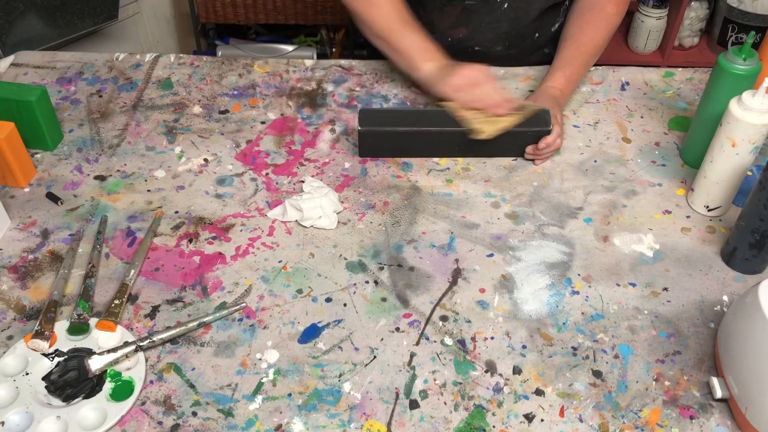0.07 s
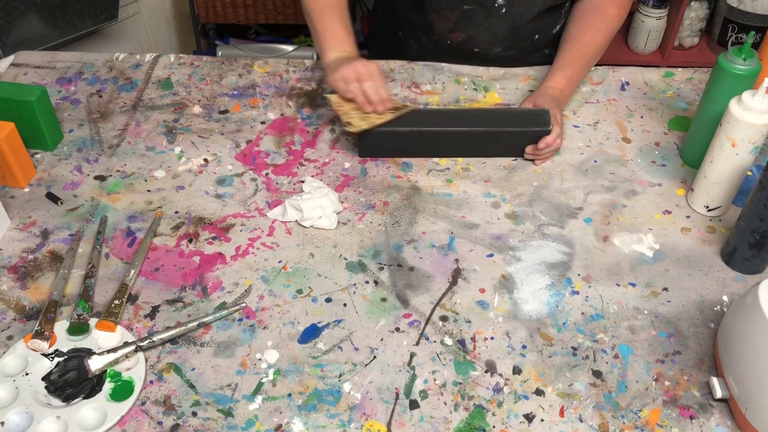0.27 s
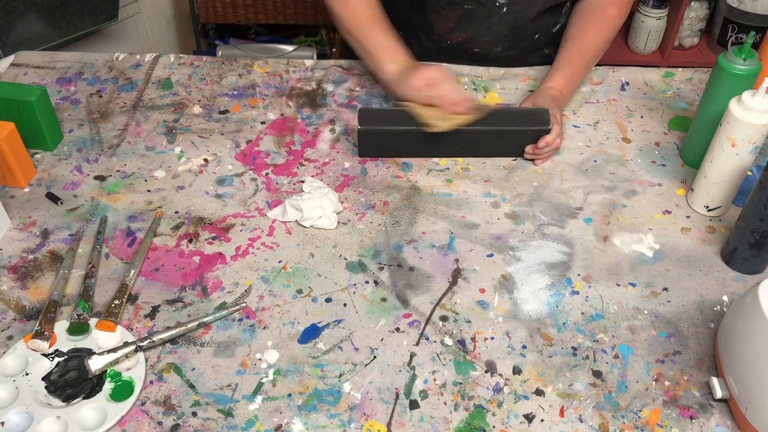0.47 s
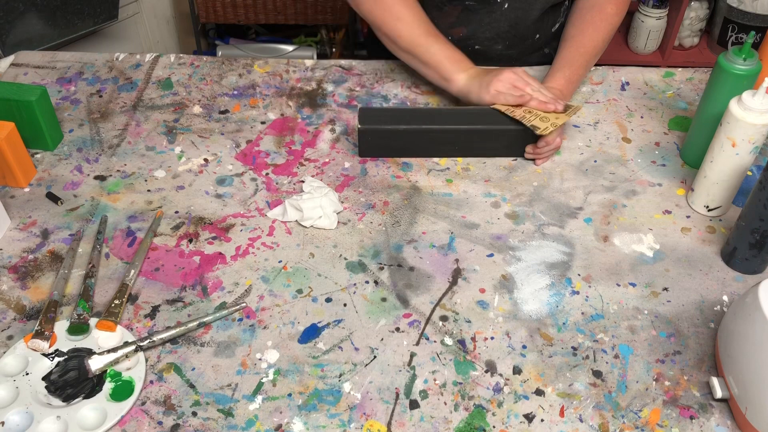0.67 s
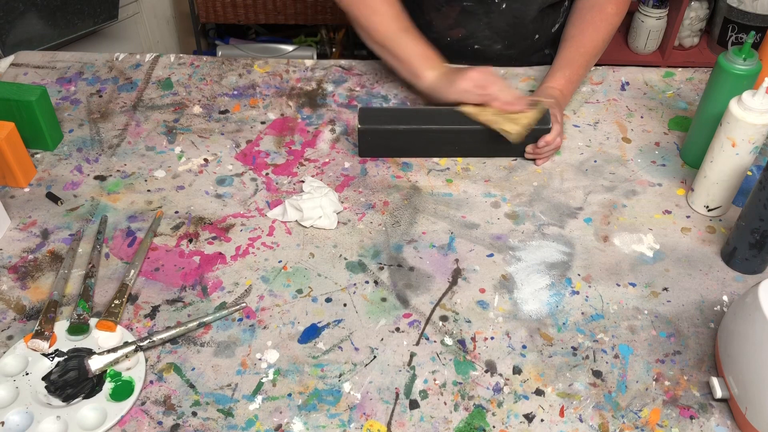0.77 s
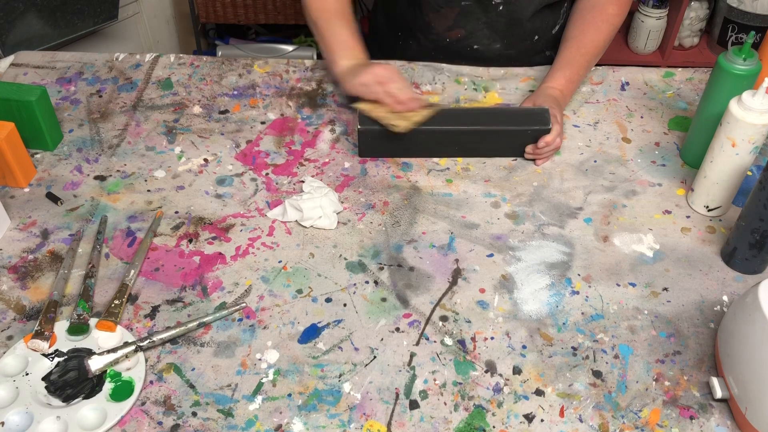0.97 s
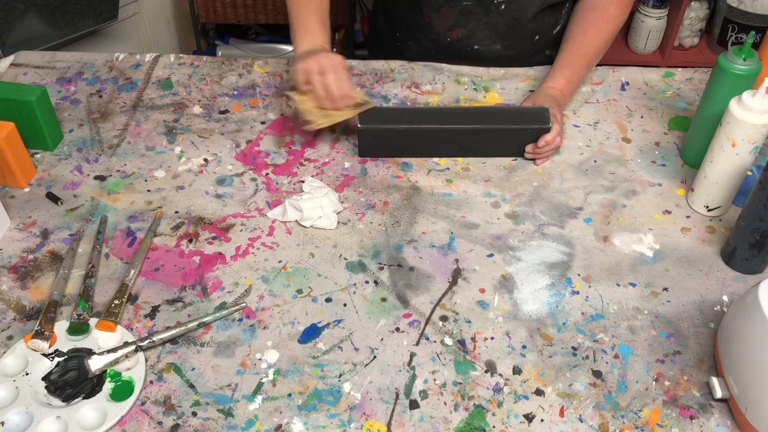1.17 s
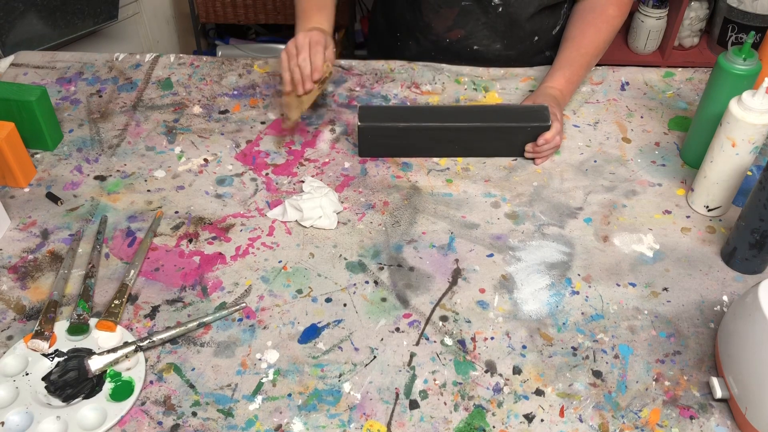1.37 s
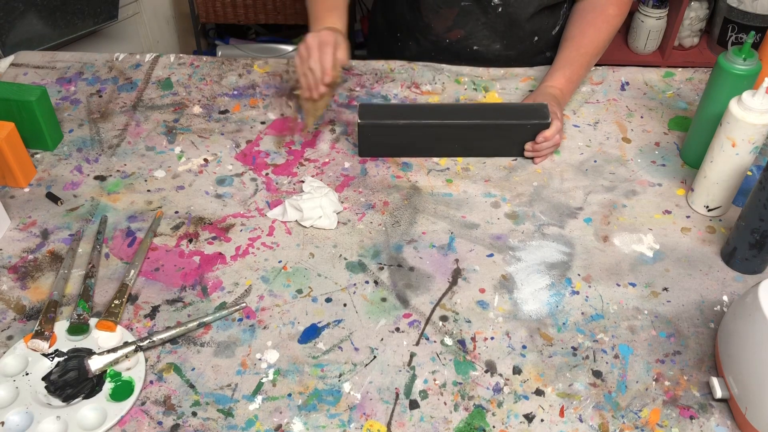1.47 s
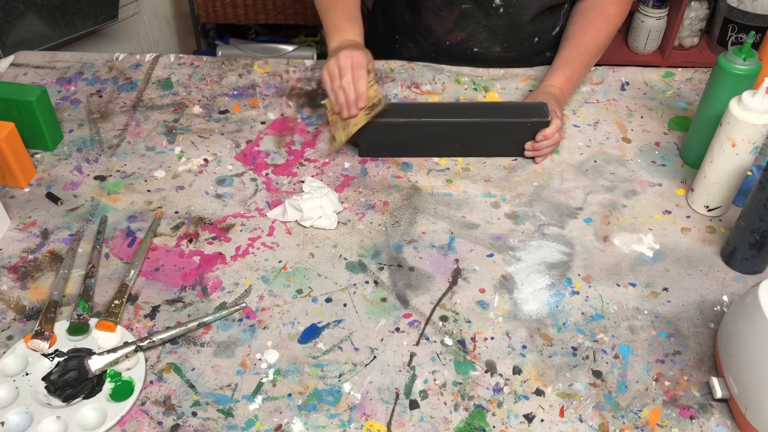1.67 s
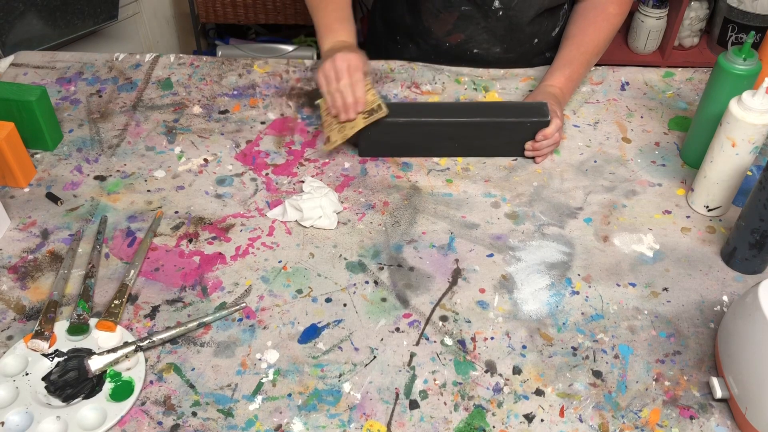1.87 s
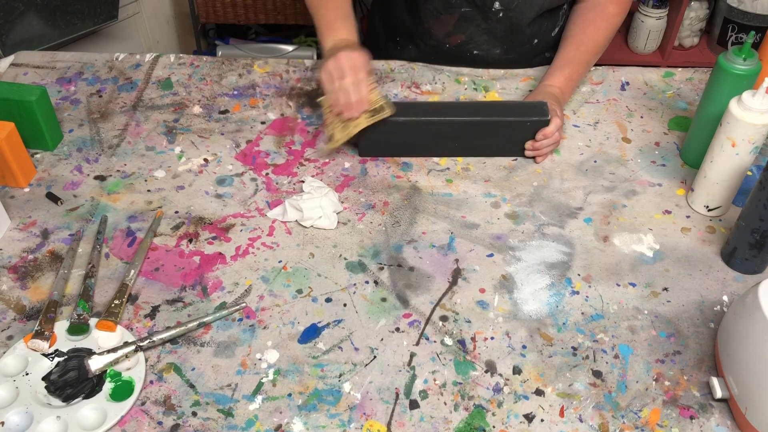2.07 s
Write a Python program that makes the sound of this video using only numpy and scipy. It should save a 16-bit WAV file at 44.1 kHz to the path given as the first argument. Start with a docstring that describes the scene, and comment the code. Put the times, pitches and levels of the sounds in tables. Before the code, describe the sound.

Sandpaper rubs the edge of a wooden block in three long, gritty strokes, then after a brief gap with a small knock and crackle, makes quick short scrapes on its end; close, in a room with low fan hum.

```python
"""At a table in a room with a fan, sandpaper rubs a wooden block: three long strokes along its edge,
then quick short strokes on its end. Dense random clicks stand for the grit. They ring the block
through resonances, and are filtered into paper hiss and table rumble. Knocks are sums of dying tones,
cracks are tiny noise bursts, and a faint tone dies away. A noise tail makes the echo.
Behind it are filtered fan noise, a low hum and a slow sway in air pressure."""
import sys
import numpy as np
from scipy import signal
from scipy.fft import rfft, irfft
from scipy.io import wavfile
from scipy.ndimage import map_coordinates

SR = 44100
rng = np.random.default_rng(int(sys.argv[2]) if len(sys.argv) > 2 else 0)


def master_out(mix):
    """Clip the mix to full scale and print it as 16-bit PCM to the path in sys.argv[1]."""
    frames = np.transpose(np.atleast_2d(mix))
    ceiling = np.clip(frames, -1, 1)
    pcm = np.round(ceiling * 32767).astype(np.int16)
    wavfile.write(sys.argv[1], SR, pcm)


N = 93756  # length in samples

# Long strokes along the edge: t/s, level/dB, then parts relative to that level, before their own trims:
# low ring/dB, second ring/dB, third ring/dB, paper hiss/dB
LONG_STROKES = [
    [(0.012, -41, -3, -14, -12, -6), (0.066, -24, -13, -10.5, -11.5, -8.5),
     (0.104, -27.5, -9.5, -9.5, -2, -0.5), (0.198, -26, -14.5, -10, -6.5, -2),
     (0.286, -29.5, -4, -9.5, -17, -2.5), (0.322, -29, -8.5, -9, -23, -8.5), (0.37, -53, 2, -22, -14, -14)],
    [(0.37, -51, 2, -9, -11, -13), (0.42, -31, -10, -7.5, -38, -1), (0.464, -29, -5.5, -8, -6, -1),
     (0.608, -29.5, -9.5, -2, -6, 3), (0.664, -39.5, -3, 0, -10, 3.5), (0.715, -55.5, -7, -10, -14, -5)],
    [(0.715, -53, -5, -17, -15, -10), (0.763, -26.5, -9.5, -13, -13, -28),
     (0.797, -20.5, -18.5, -15.5, -5, -11), (1.101, -25.5, -2.5, -14, -16, -7),
     (1.143, -37, 1, -6.5, -11, -3.5), (1.187, -29, -3, -12.5, -11, -9),
     (1.237, -41.5, -11.5, -30, -6.5, -9.5), (1.27, -88, -11, -10, -8, -6)],
]
# Short strokes on the end: t/s, level/dB, table rumble/dB (not relative),
# then relative to level: paper hiss/dB, low ring/dB; the last three are before their own trims
SHORT_STROKES = [
    [(1.632, -48, -44, 4, -4), (1.644, -53.5, -40.5, -6, 2), (1.668, -70, -50, -14, -9)],
    [(1.672, -69, -65, -10, -5), (1.692, -29, -41, -7.5, -7.5), (1.714, -35.5, -46, -7, -6),
     (1.728, -42, -44, -6, -8), (1.746, -62, -48, 1, -6), (1.76, -66, -65, -1, -6)],
    [(1.765, -68, -52, -10, -6), (1.771, -55, -62, -6, -11), (1.787, -31, -44, -12, -11.5),
     (1.803, -36.5, -41.5, -12, -8), (1.825, -53, -38, 0, -2), (1.84, -73, -70, -8, -5)],
    [(1.84, -66, -66, 1, -4), (1.86, -36, -39.5, -7.5, -11), (1.882, -31.5, -39, -10, -11),
     (1.904, -49, -46, 6, -10), (1.917, -65, -60, -2, -8)],
    [(1.917, -70, -54, -2, -6), (1.929, -34, -51, -5, -12), (1.943, -40, -34.5, -5, -9),
     (1.963, -26.5, -35.5, -8.5, -7), (1.977, -28.5, -34, -9.5, -13), (2.005, -66, -51, 1, 0)],
    [(2.005, -56, -55, -5, -3), (2.011, -62, -63, 2, -7), (2.023, -34.5, -45, -4, -10.5),
     (2.055, -34.5, -30.5, -2.5, -5), (2.065, -29, -41, -5.5, -10.5), (2.098, -60, -41, 2, -5)],
    [(2.098, -73, -61, 6, -15), (2.116, -34.5, -42, 0.5, -8), (2.125, -35, -37, -2, -9)],
]

# Block resonances: f/Hz, width/Hz, level/dB (within the set; a resonance used alone is scaled to rms 1)
EDGE_SECOND_RING = [(2760, 1650, -2)]
EDGE_LOW_RING = [(1312, 660, -2.74), (1910, 1070, -1.5)]
EDGE_THIRD_RING = [(3880, 1500, -0.39), (4800, 820, -1.1)]
EDGE_UPPER_RING = [(5340, 2000, 0.2), (6900, 620, -0.32), (7660, 640, -2.6)]
END_MAIN_RING = [(3180, 280, 3), (4357, 140, 2.5), (5130, 250, -3), (7500, 330, -13), (10200, 600, -14.5)]
END_LOW_RING = [(1518, 240, -2.5), (2040, 570, -3), (2670, 450, -5.5)]

# Spectrum shapes, each scaled to rms 1 afterwards: f/Hz, level/dB
PAPER_HISS = [(2000, -78), (5000, -2), (8000, -1.5), (11000, -3.5), (14000, -4.5), (16000, -10)]
EDGE_TABLE_RUMBLE = [(60, -5), (200, -1), (400, -5), (800, -3), (1100, -10.5), (2500, -102)]
END_TABLE_RUMBLE = [(60, -21), (200, 3), (380, 1), (550, -3.5), (800, -11), (1100, -16), (2500, -48)]
FAN_NOISE = [(15, -23), (25, 11.5), (64, -8), (107, -4.5), (144, -0.5), (183, 1.5), (267, -29.5),
             (313, -17.5), (421, -30), (482, -22.5), (614, -31), (762, -25.5), (919, -35), (3720, -54),
             (10400, -47.5), (12800, -50), (15500, -56)]

# Bounce off the table top, as the spacing of the spectrum peaks it makes: t/s, spacing f/Hz
TABLE_BOUNCE = [(0, 1300), (.15, 1390), (.3, 1580), (.42, 1585), (.6, 1360), (.8, 1340), (.92, 1400),
                (1.02, 1527), (1.2, 1604)]
# Bounce spacings between which the edge's low ring glides: lower f/Hz, upper f/Hz
LOW_RING_GLIDE = (1420, 1660)
# Knocks of paper or hand on the block: t/s, peak level/dB, softness f/Hz
BLOCK_KNOCKS = [(1.214, -29.5, 1500), (1.315, -43.5, 4000), (1.6315, -24, 9000), (1.635, -26, 3000),
                (1.6373, -36, 5000)]
# Ways the block on the table vibrates when knocked: f/Hz, level/dB before softening, time to fall 60 dB/s
BLOCK_MODES = [(315, 3, 0.019), (590, -8, 0.043), (973, -9, 0.076), (1560, -11, 0.032), (1910, 3.5, 0.014),
               (2320, 2, 0.01), (2930, -17, .012), (4570, -2, 0.0054), (6000, 0, 0.0051),
               (8500, -14, 0.0026)]
# Paper cracks: t/s, peak level/dB
PAPER_CRACKS = [(1.4955, -52), (1.5135, -24), (1.5131, -37)]
# One faint ring: t/s, f/Hz, starting level/dB, time to fall 60 dB/s
FAINT_RING = (1.245, 1765, -63, .4)
# Slow pressure sway: t/s, greatest level/dB
PRESSURE_SWAY = [(0, -6), (.25, -10), (.45, -19), (.8, -7), (1.0, -10), (1.2, -23), (1.7, -23), (1.85, -13),
                 (2.1, -14)]

# Trims in dB, added to the stroke tables
EDGE_SECOND_DB, EDGE_THIRD_DB, EDGE_LOW_DB, EDGE_HISS_DB = 3, -6, -1, 1
EDGE_UPPER_DB = -12.5  # relative to the stroke level
EDGE_RUMBLE_DB, RUMBLE_FOLLOWS = -30, 0.46  # rumble moves 0.46 dB for each dB of stroke level
END_RING_DB, END_LOW_DB, END_HISS_DB, END_RUMBLE_DB = -4, 0.5, -3, -0.5

GRIT_PER_S, GRIT_SPREAD_DB = 14000, 2
CHATTER_DB, CHATTER_HZ = 0.5, 35
WANDER_DB, WANDER_HZ = 1.5, 10.6
BOUNCE_SHARE, BOUNCE_CUT_HZ = 0.4, 6000
CRACK_HZ, CRACK_WIDTH_HZ, CRACK_T60_S = 12000, 7500, 0.0016
ECHO_T60_S, ECHO_DB = 0.18, -13
FAN_DB, SWAY_HZ = -32.5, 3
HUM_HZ, HUM_WIDTH_HZ, HUM_NOISE_DB, HUM_TONE_DB = 118.9, 6.2, -43.5, -41.5
TOP_STOP_HZ = 15993  # from here up, sound is at least 70 dB down


def long_strokes():
    """Rub along the edge: grit rings the block and hisses, the table adds a bounce and a rumble."""
    level, low, second, third, hiss = curves(LONG_STROKES)
    shared_grit = grit()
    rub = amp(EDGE_SECOND_DB + second) * ring(shared_grit, EDGE_SECOND_RING)
    rub += amp(EDGE_THIRD_DB + third) * ring(shared_grit, EDGE_THIRD_RING)
    rub += amp(EDGE_LOW_DB + low) * low_ring(grit())
    rub += amp(EDGE_UPPER_DB) * ring(grit(), EDGE_UPPER_RING)
    rub += amp(EDGE_HISS_DB + hiss) * colour(grit(), PAPER_HISS)
    rumble_gain = amp(EDGE_RUMBLE_DB + RUMBLE_FOLLOWS * level)
    return bounce(amp(level) * rub) + rumble_gain * colour(shared_grit, EDGE_TABLE_RUMBLE)


def grit():
    """Grains of sand catch: dense clicks of uneven size and random sign, with chattering pressure."""
    sizes = amp(GRIT_SPREAD_DB * np.minimum(rng.exponential(1, N), 5))
    signs = rng.choice([-1, 1], N)
    catches = rng.random(N) < GRIT_PER_S / SR
    chatter = amp(CHATTER_DB * drift(CHATTER_HZ))
    return unit(sizes * signs * catches * chatter)


def low_ring(clicks):
    """Blend two block resonances, leaning to the higher one as the bounce spacing widens."""
    s, hz = np.transpose(TABLE_BOUNCE)
    spacing = np.interp(np.arange(N) / SR, s, hz)
    glide = (spacing - LOW_RING_GLIDE[0]) / (LOW_RING_GLIDE[1] - LOW_RING_GLIDE[0])
    up = np.clip(glide, 0.15, 0.9)  # both resonances always stay in
    lower = ring(clicks, EDGE_LOW_RING[:1])
    upper = ring(clicks, EDGE_LOW_RING[1:])
    return np.sqrt(1 - up) * lower - np.sqrt(up) * upper


def bounce(x):
    """Add the duller, later sound off the table top; its moving delay makes moving spectrum peaks."""
    s, hz = np.transpose(TABLE_BOUNCE)
    lag = SR / np.interp(np.arange(N) / SR, s, hz)  # in samples
    low_pass = signal.butter(1, BOUNCE_CUT_HZ, fs=SR, output="sos")
    dull = signal.sosfiltfilt(low_pass, x)
    return x + BOUNCE_SHARE * map_coordinates(dull, [np.arange(N) - lag], order=3)


def short_strokes():
    """Rub on the end grain: grit rings another set of resonances, hisses and shakes the table."""
    level, rumble, hiss, low = curves(SHORT_STROKES)
    shared_grit = grit()
    rub = amp(END_RING_DB) * ring(shared_grit, END_MAIN_RING)
    rub += amp(END_LOW_DB + low) * ring(shared_grit, END_LOW_RING)
    rub += amp(END_HISS_DB + hiss) * colour(grit(), PAPER_HISS)
    return amp(level) * rub + amp(rumble + END_RUMBLE_DB) * colour(shared_grit, END_TABLE_RUMBLE)


def knocks():
    """Each knock rings the block as dying tones; a soft one leaves the high tones weak."""
    out, t = np.zeros(N), np.arange(SR // 4) / SR
    for s, db, soft_hz in BLOCK_KNOCKS:
        hit = np.zeros(len(t))
        for hz, mode_db, t60 in BLOCK_MODES:
            fade = amp(mode_db + rng.normal(0, 1) - 60 * t / t60)  # strength varies from knock to knock
            hit += fade * np.sin(2 * np.pi * hz * t) / (1 + (hz / soft_hz) ** 2)
        out[int(s * SR):][:len(t)] += amp(db) * hit / np.abs(hit).max()
    return out


def paper_cracks():
    """Each crack is a very short, bright burst of fading noise through two equal resonances."""
    out, k = np.zeros(N), np.arange(300)
    for s, db in PAPER_CRACKS:
        burst = amp(-60 * k / SR / CRACK_T60_S) * rng.standard_normal(len(k))
        for _ in range(2):
            burst = resonate(burst, CRACK_HZ, CRACK_WIDTH_HZ)
        out[int(s * SR):][:len(k)] += amp(db) * burst / np.abs(burst).max()
    return out


def faint_tone():
    """A thin sine tone that dies away."""
    s, hz, db, t60 = FAINT_RING
    t = np.maximum(np.arange(N) / SR - s, 0)  # held at 0, so silent, before it starts
    return amp(db - 60 * t / t60) * np.sin(2 * np.pi * hz * t)


def echo(x):
    """Spread the sound into a diffuse room tail, using fading noise as the echo pattern."""
    k = np.arange(SR // 2)
    tail = rng.standard_normal(len(k)) * amp(-60 * k / SR / ECHO_T60_S)
    return signal.fftconvolve(x, tail / np.sqrt(np.sum(tail ** 2)))[:N]


def room_tone():
    """Fan noise, a hum made of narrow noise plus a steady tone, and a slow sway in air pressure."""
    t = np.arange(N) / SR
    fan = amp(FAN_DB) * colour(rng.standard_normal(N), FAN_NOISE)
    wavering_hum = unit(resonate(rng.standard_normal(N), HUM_HZ, HUM_WIDTH_HZ))
    steady_hum = np.sin(2 * np.pi * HUM_HZ * t)
    s, db = np.transpose(PRESSURE_SWAY)
    sway = amp(np.interp(t, s, db)) * np.tanh(drift(SWAY_HZ))  # tanh limits the swing
    return fan + amp(HUM_NOISE_DB) * wavering_hum + amp(HUM_TONE_DB) * steady_hum + sway


def amp(db):
    """Turn dB into a gain."""
    return 10 ** (np.asarray(db) / 20)


def unit(x):
    """Scale to rms 1, a standard average strength."""
    return x / np.sqrt(np.mean(x ** 2) + 1e-20)


def curves(tables):
    """Join stroke tables into smooth control lines, at -120 dB outside the strokes."""
    t = np.arange(N) / SR
    out = np.full((len(tables[0][0]) - 1, N), -120.)
    for rows in tables:
        s, *cols = np.transpose(rows)
        on = (t >= s.min()) & (t <= s.max())
        out[:, on] = [np.interp(t[on], s, c) for c in cols]
    return out


def colour(x, points):
    """Shape a sound's spectrum by (f/Hz, level/dB) points, then scale to rms 1."""
    hz, db = np.transpose(points)
    f = np.maximum(np.fft.rfftfreq(len(x), 1 / SR), 1)
    gain = amp(np.interp(np.log(f), np.log(hz), db, left=-90))
    return unit(irfft(rfft(x) * gain, len(x)))


def resonate(x, hz, width_hz):
    """One resonance: it favours sound near hz, with a gain of about 1 at its peak."""
    r = np.exp(-np.pi * width_hz / SR)
    feed = np.array([1, 0, -1]) * (1 - r * r) / 2
    return signal.lfilter(feed, [1, -2 * r * np.cos(2 * np.pi * hz / SR), r * r], x)


def ring(x, table):
    """Side-by-side resonances with alternating signs, each wandering in strength; rms 1."""
    total = np.zeros(N)
    for k, (hz, width_hz, db) in enumerate(table):
        strength = amp(db + WANDER_DB * drift(WANDER_HZ))
        total += (-1) ** k * strength * resonate(x, hz, width_hz)
    return unit(total)


def drift(rate_hz):
    """Slow random movement of rms 1: noise smoothed twice."""
    r = np.exp(-2 * np.pi * rate_hz / SR)
    smooth = signal.lfilter([1], [1, -2 * r, r * r], rng.standard_normal(N + SR))
    return unit(smooth[SR:])  # skip the filter's first second


def scene():
    """Mix near sounds, their echo and the room; both channels are alike."""
    near = long_strokes() + short_strokes() + knocks() + paper_cracks() + faint_tone()
    mix = near + amp(ECHO_DB) * echo(near) + room_tone()
    return np.array([mix, mix])


def record(dry):
    """Cut the very top of the treble steeply."""
    return signal.sosfilt(signal.cheby2(16, 70, TOP_STOP_HZ, fs=SR, output="sos"), dry)


dry = scene()
out = record(dry)
master_out(out)
```